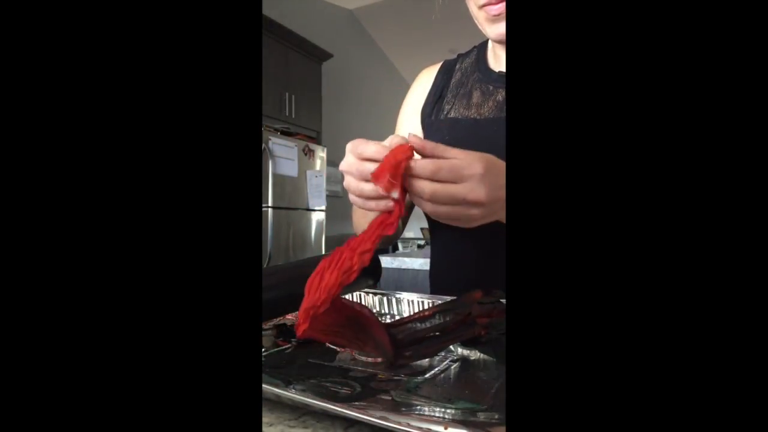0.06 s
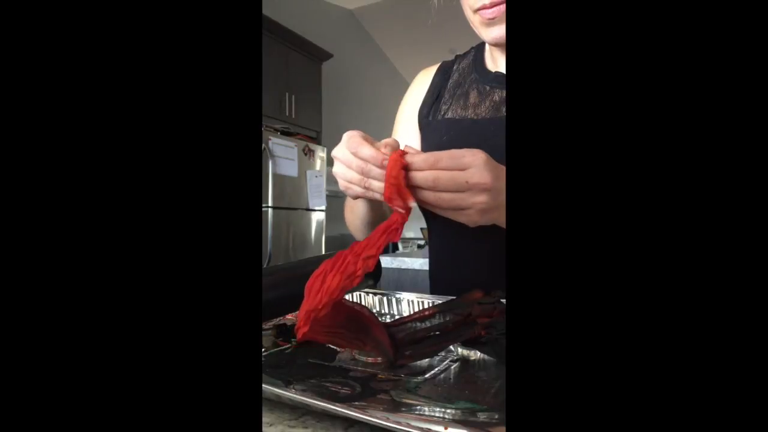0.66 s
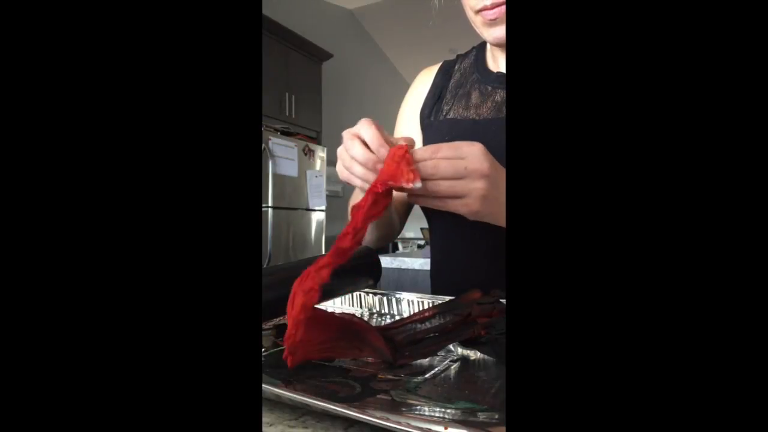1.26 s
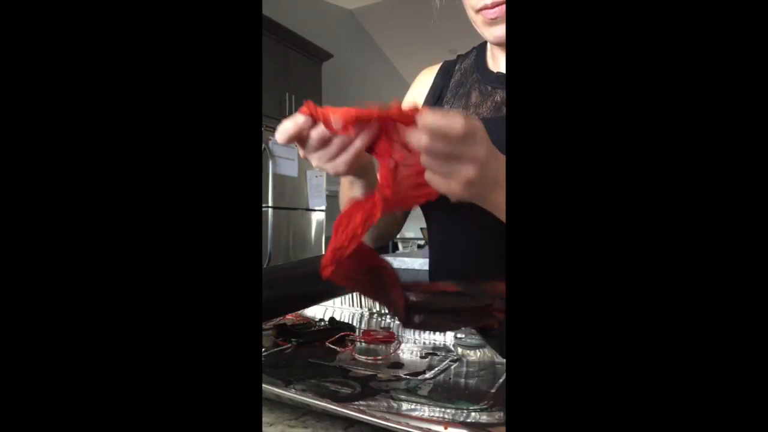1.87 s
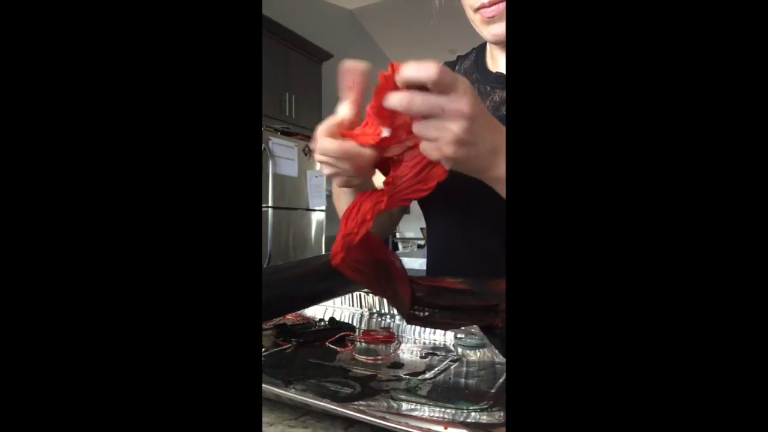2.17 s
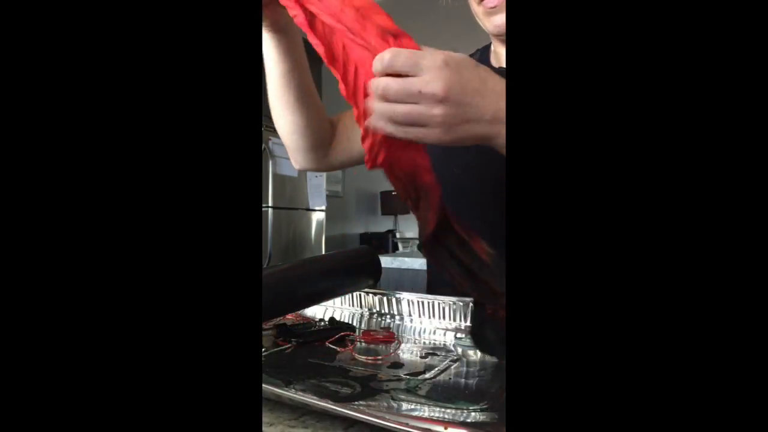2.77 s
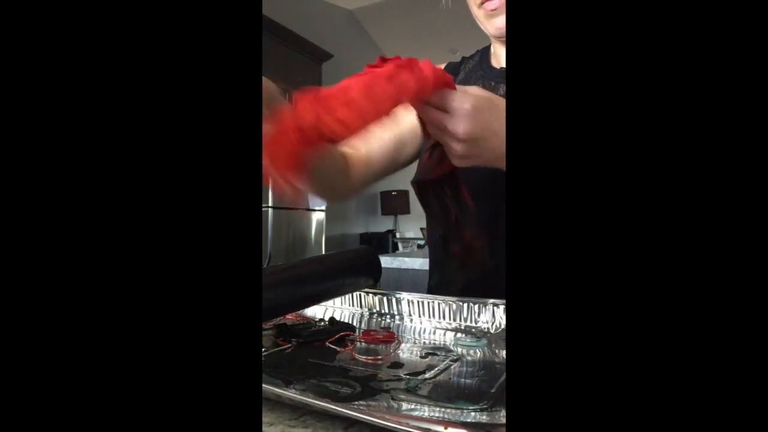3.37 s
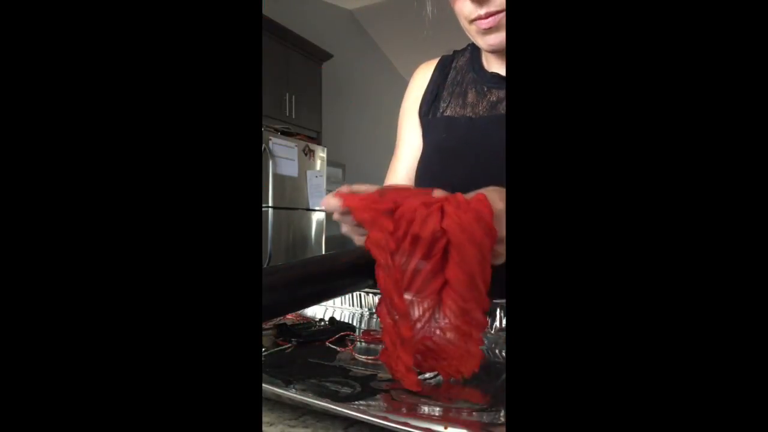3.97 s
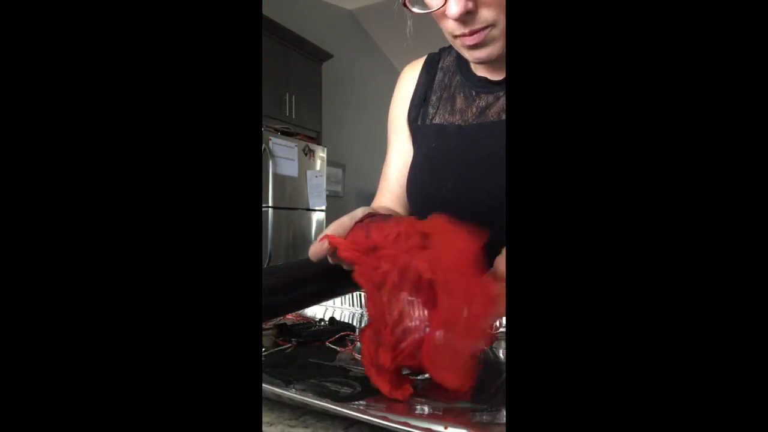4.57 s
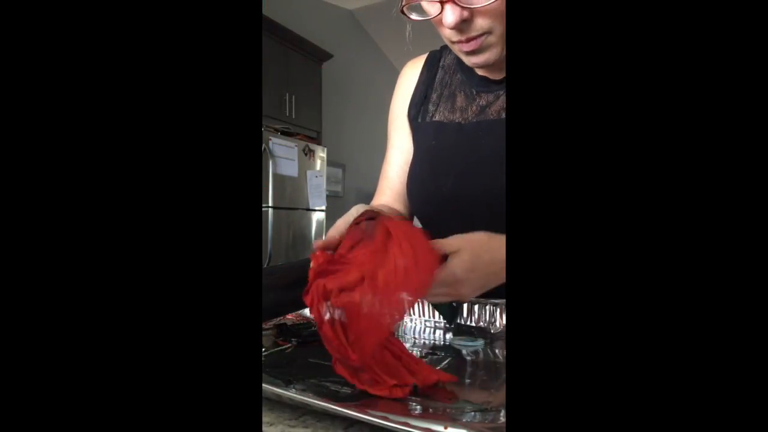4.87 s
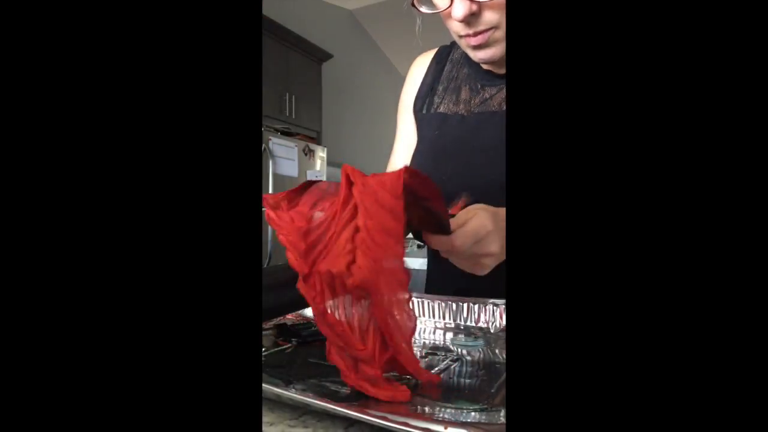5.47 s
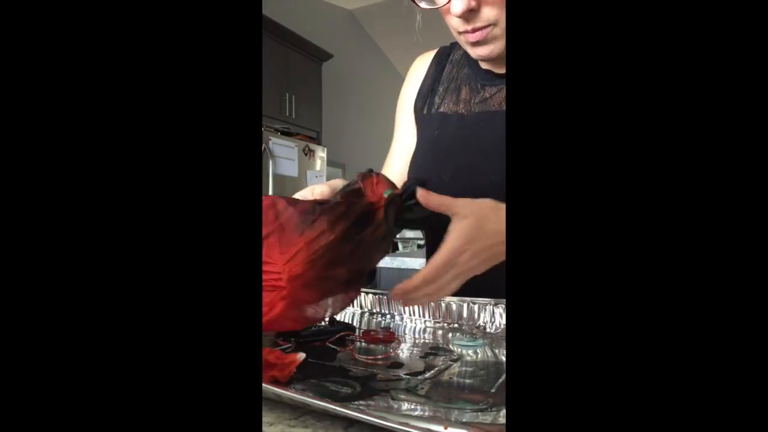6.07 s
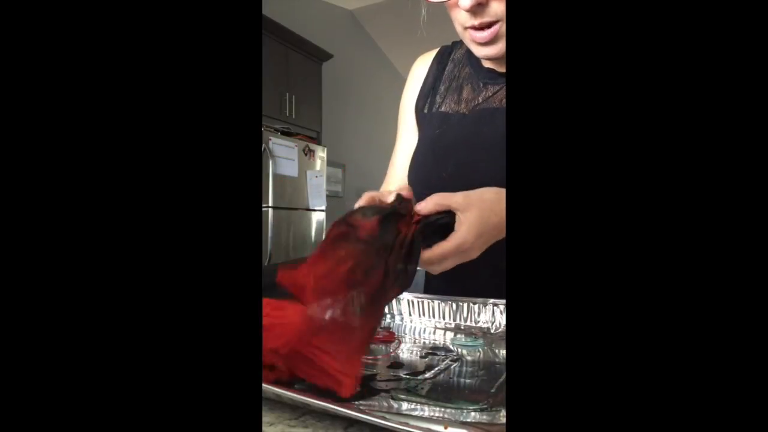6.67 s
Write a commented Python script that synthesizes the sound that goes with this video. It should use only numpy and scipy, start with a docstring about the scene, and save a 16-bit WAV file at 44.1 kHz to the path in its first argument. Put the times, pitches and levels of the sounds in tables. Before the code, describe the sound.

A faint, steady appliance hum fills a small kitchen throughout. Close to one microphone, a dry, stiff scarf gives way with a soft bump at about 0.1 seconds. From 1 second there are sparse, quiet rubs and crinkles, with another padded bump at 1.7. Between 2.2 and 3 seconds the taut cloth swishes through the fingers, growing louder. Just after 3 seconds stiff creases snap with a burst of crumpling. After a brief lull, the loudest crunch and a hollow bump come at 3.7. From there to about 6 seconds the scarf is shaken open in busy, uneven rustles: a fine hiss of threads, light flaps, folds brushing a foil tray and sharp dry ticks, with a further bump near 4.9. Two soft bumps and a tick fall around 6.2, then smaller crinkles continue until about 6.8. The counter and walls add a short tail.

```python
"""An appliance hums in a small kitchen; then, close to the one microphone, cloth gives way with a soft bump.
A dry, dye-stiffened scarf is being pulled off its pole and shaken open over a foil tray.
Threads rub with a fine hiss, folds crumple and brush the tray, and the loose cloth flaps.
From about two seconds the taut weave swishes through the fingers; from three, stiff creases snap.
The counter and the walls add a short tail."""
import sys
import numpy as np
from scipy import signal
from scipy.fft import rfft, irfft
from scipy.io import wavfile
from scipy.ndimage import uniform_filter1d

SR = 44100
rng = np.random.default_rng(int(sys.argv[2]) if len(sys.argv) > 2 else 0)


def waveform_to_disk(signal):
    """Save audio, clipped to [-1, 1], as 16-bit WAV at the path in sys.argv[1]."""
    frames = np.transpose(np.atleast_2d(signal))
    scaled = np.clip(frames, -1, 1) * 32767
    samples = np.round(scaled).astype(np.int16)
    wavfile.write(sys.argv[1], SR, samples)


N = 296793
TIME = np.arange(N) / SR

# The appliance in the background. Each row: frequency in Hz, rms level in dB.
HUM_PARTIALS = [(60, -81), (120, -80.5), (200, -77.5), (360.5, -65.5), (420, -78), (840, -101)]
# Folds giving way or slapping the tray. Each row: start in seconds, level in dB, hiss against
# that level in dB, ring in Hz, seconds to fall 60 dB.
FOLD_EVENTS = [(0.127, -54, -28, 1150, .06), (0.138, -53.5, -21, 1400, 0.086),
               (1.141, -65, -12, 1460, 0.073), (1.531, -67, -12, 1510, 0.075),
               (1.727, -52, -7, 1710, 0.032), (1.878, -65.5, -11, 1420, 0.15),
               (2.07, -65.5, 3, 3000, 0.067), (2.202, -52, -18, 1430, 0.031),
               (2.711, -54, -13, 1680, 0.052), (2.802, -53.5, 1, 1550, 0.078),
               (3.021, -47.5, 0, 2230, 0.38), (3.098, -32.5, -12, 1340, 0.064),
               (3.116, -36, -30, 1210, 0.068), (3.396, -63.5, -6, 2600, 0.14),
               (3.718, -24.5, -3.5, 1340, 0.049), (3.727, -30, -12, 1050, 0.063),
               (3.758, -32.5, 2.5, 1240, 0.023), (3.905, -40.5, -0.5, 3230, 0.093),
               (4.017, -41, -0.5, 1370, 0.095), (4.183, -34, -10, 2300, 0.048),
               (4.197, -37, -6, 1420, 0.063), (4.268, -35, -25, 2370, .033), (4.286, -37, -27, 1230, 0.14),
               (4.318, -36, -25, 2480, .1), (4.455, -46, -3.5, 1630, 0.075),
               (4.586, -38.5, -24, 1460, 0.081), (4.741, -46, -4.5, 3280, 0.11),
               (4.805, -34.5, -17, 1470, 0.071), (4.818, -37, -6.5, 1480, 0.08),
               (4.859, -41.5, -17, 1430, 0.041), (4.906, -41, -7, 2560, 0.057),
               (5.008, -55.5, -8, 1690, 0.089), (5.094, -50, -5, 1480, 0.095),
               (5.797, -48.5, -10, 1470, 0.17), (5.839, -54, 12, 3000, 0.12),
               (5.92, -35.5, -2, 2750, 0.044), (6.027, -45, 6.5, 2730, 0.033),
               (6.053, -42.5, -23, 2700, 0.084), (6.244, -37.5, -34, 1430, 0.033),
               (6.324, -53.5, -25, 1260, 0.11), (6.418, -45, -5.5, 1440, 0.028),
               (6.47, -50.5, -4, 1370, 0.031), (6.546, -52, -11, 1410, 0.032),
               (6.631, -52.5, -11, 1310, 0.065), (6.713, -42.5, -13, 2580, 0.075)]
# Fixed resonances, strongest near 1.45 kHz, that colour the crumpling folds.
# Each row: frequency in Hz, width in Hz, relative level in dB.
BODY_MODES = [(1013, 51, 3.5), (1240, 86, 3.5), (1464, 37, 23.5), (1466, 33, 5), (1930, 280, -11.5),
              (2500, 18, -28), (2770, 44, -25), (3450, 570, -3)]
# Hands meeting bunched cloth. Each row: start in seconds, level in dB, pitch in Hz.
HAND_BUMPS = [(0.142, -42.5, 230), (1.722, -34, 510), (3.721, -25.5, 270), (3.994, -33.5, 263),
              (4.859, -26.5, 370), (5.866, -40.5, 283), (5.872, -45.5, 68), (5.876, -39.5, 170),
              (6.244, -36.5, 333), (6.265, -34.5, 284)]
# Hands stroking the cloth. Each row: start and length in seconds, levels of rubbing, crumpling
# and flapping in dB, pitch of the buckling folds in Hz.
HAND_STROKES = [(1.122, 0.023, -78, -77, -76, 1610), (1.455, 0.016, -76, -80, -86, 2800),
                (1.645, 0.19, -78.5, -77, -71, 2620), (1.976, 0.16, -77, -76, -75, 3100),
                (2.182, 0.077, -68.5, -73, -68.5, 2960), (2.455, 0.088, -66.5, -70.5, -67.5, 2560),
                (2.605, 0.24, -71, -73, -71, 2160), (2.867, 0.17, -58.5, -57.5, -66, 2370),
                (3.04, 0.037, -54, -43.5, -68, 2350), (3.114, 0.014, -51.5, -48, -50, 1220),
                (3.756, 0.034, -50.5, -51, -53.5, 1800), (3.826, 0.067, -61.5, -58, -58, 2150),
                (3.962, 0.088, -53.5, -51, -54.5, 3370), (4.064, 0.14, -58.5, -61.5, -56.5, 1850),
                (4.196, 0.0087, -49.5, -44.5, -48.5, 2220), (4.266, 0.069, -57.5, -41, -57.5, 2410),
                (4.464, 0.061, -59, -58, -87, 2500), (4.581, 0.078, -56, -51.5, -64.5, 1850),
                (4.824, 0.037, -63.5, -50, -51.5, 1540), (4.887, 0.043, -64, -58.5, -60.5, 2000),
                (5.11, 0.066, -62.5, -57.5, -79, 2760), (5.184, .11, -58, -57.5, -66, 3170),
                (5.28, 0.17, -59.5, -62, -58, 2430), (5.492, 0.042, -55, -57.5, -55.5, 2850),
                (5.586, 0.089, -62, -53.5, -66.5, 3130), (5.669, .07, -58, -65, -60.5, 2600),
                (5.777, 0.02, -52, -52, -53, 2940), (5.86, 0.0069, -47.5, -55, -45, 2300),
                (5.98, 0.041, -68, -55, -66, 2440), (6.057, 0.026, -56, -54.5, -58.5, 2420),
                (6.256, 0.022, -68, -58.5, -57, 1650), (6.336, .11, -69, -69, -68.5, 2400),
                (6.492, 0.12, -72.5, -78, -70.5, 2090), (6.725, .03, -58, -68, -79, 2960)]
# The scarf running through the fingers. Each row: start and length in seconds, level in dB,
# lift of the silky top in dB.
TAUT_PULLS = [(2.205, .03, -66, 27), (2.474, 0.094, -70, 6), (2.87, 0.0048, -49.5, 1),
              (2.931, 0.05, -42.5, 4)]
# Stiff creases snapping. Each row: start in seconds, strength in dB, ring in Hz.
CREASE_SNAPS = [(3.058, -23, 2280), (3.101, -17.5, 2240), (3.9049, -15.5, 3150), (4.136, -31, 2960),
                (4.1858, -21, 2280), (4.2872, -14, 2540), (5.3188, -21.5, 1830), (5.412, -23, 3040),
                (5.4465, -40, 2950), (5.5674, -29, 3400), (5.669, -19.5, 3160), (6.246, -34, 3100)]
# The tone of each source and of the walls. Each row: frequency in Hz, relative level in dB.
ROOM_TONE_SPECTRUM = [(28, -21.5), (42, 4), (200, 0), (300, -3.5), (395, 9), (470, -7), (630, -12),
                      (800, -15.5), (1500, -20.5), (3000, -21.5), (5000, -27.5), (9000, -28),
                      (15500, -29.5)]
CRUMPLE_SPECTRUM = [(80, -21), (300, -24), (620, -3.5), (850, -15.5), (1400, 4), (1780, -10), (2500, 4.5),
                    (3750, -5.5), (4700, -10), (8000, -32.5), (16000, -65)]
THUMP_SPECTRUM = [(60, -67), (130, -14), (200, -12.5), (300, 1), (380, 11), (500, -1.5), (700, -10),
                  (1200, -15), (3000, -30)]
THREAD_SPECTRUM = [(600, -22.5), (1400, -1.5), (3000, 7), (4700, 0.5), (5400, 3.5), (6600, 1), (7400, -2.5),
                   (8600, 0.5), (10400, -6.5), (11400, -3.5), (13000, -5), (15800, -8)]
FLAP_SPECTRUM = [(35, -46), (60, -4), (120, -11), (155, -4.5), (205, -2), (290, -5.5), (380, 4.5),
                 (500, -3), (610, -2.5), (760, -8.5), (1200, -8), (3000, -39)]
TAUT_SPECTRUM = [(700, -11), (1150, -5.5), (1450, 6), (1850, -5), (2500, 1), (4500, -2), (5300, -2),
                 (7000, 1.5), (8500, -1.5), (10400, -12), (11300, -3.5), (12700, -16), (15800, -18)]
CREASE_SPECTRUM = [(100, -48), (400, 11), (1300, -6.5), (3200, 1), (5000, -6), (9000, -7), (16000, -22)]
WALL_SPECTRUM = [(200, 0), (2500, -4), (6000, -4), (16000, -18)]


def undb(db):
    """Decibels to gain."""
    return 10 ** (np.asarray(db) / 20)


def unit(response):
    """Scales a response so that white noise keeps its power."""
    return response / np.sqrt(np.sum(response ** 2))


def through(x, response):
    """Plays x through an impulse response."""
    return signal.fftconvolve(x, response)[:len(x)]


def colour(points, size=4096):
    """Minimum-phase response shaped by (Hz, dB) points, at unit power."""
    hz, db = np.transpose(points)
    gain_db = np.interp(np.log(np.arange(size // 2 + 1) * SR / size + 1), np.log(hz), db)
    cepstrum = irfft(np.log(undb(gain_db)))
    cepstrum[1:size // 2] *= 2
    cepstrum[size // 2 + 1:] = 0
    return unit(irfft(np.exp(rfft(cepstrum))))


def ring(hz, width_hz, size=4096):
    """Response of one resonance, equally high at its centre for any width."""
    t = TIME[:size]
    return width_hz * np.heaviside(t, .5) * np.exp(-np.pi * width_hz * t) * np.cos(2 * np.pi * hz * t)


def fade(t, t60):
    """Decay that falls 60 dB in t60 seconds."""
    return np.exp(-np.log(1000) * t / max(t60, .002))


def wander(rate_hz):
    """Smooth random drift with a spread near 1."""
    hold = int(SR / rate_hz)
    steps = np.clip(rng.standard_normal(4096)[:N // hold + 1], -2, 2)
    return 1.34 * uniform_filter1d(np.repeat(steps, hold), hold)[:N]


def slips(per_second, spread_db):
    """Tiny stick-slip clicks of uneven strength at random moments; rms 1."""
    strength = undb(spread_db * np.minimum(rng.exponential(size=N), np.pi))
    clicks = (rng.random(N) < per_second / SR) * strength * rng.choice([-1, 1], N)
    return clicks / clicks.std()


def kitchen(air_db=-67):
    """Room tone: steady air noise and the slightly wavering hum of an appliance."""
    air = through(rng.standard_normal(N), colour(ROOM_TONE_SPECTRUM)) * undb(air_db + 0.12 * wander(2.8))
    hum = np.zeros(N)
    for hz, db in HUM_PARTIALS:
        amplitude = np.sqrt(2) * undb(db + 0.26 * wander(2.6))
        hum += amplitude * np.sin(2 * np.pi * hz * TIME + 0.17 * wander(5.3))
    return air + hum


def fold_body(body_db=1):
    """Response of a fold: a broad crunch coloured by fixed resonances, strongest near 1.45 kHz."""
    modes = unit(sum(undb(db) * ring(hz, width) for hz, width, db in BODY_MODES))
    return unit(colour(CRUMPLE_SPECTRUM) + undb(body_db) * modes)


def folds(width_hz=300, ring_db=0.5, thump_db=-13, size=6000):
    """Each fold lets go in a dying run of slips that rings at its own pitch, with a thump and a hiss."""
    out, t = np.zeros(N + size), TIME[:size]
    body, thump_tone, thread_tone = fold_body(), colour(THUMP_SPECTRUM), colour(THREAD_SPECTRUM)
    for start_s, db, hiss_db, hz, t60 in FOLD_EVENTS:
        rise_s = 0.00091 * 2 ** ((-28.5 - db) / 19.5)  # weak folds give way more softly
        runs = rng.standard_normal((3, size)) * (1 - np.exp(-t / rise_s)) * fade(t, t60)
        crunch = through(runs[0], unit(body + undb(ring_db) * unit(ring(hz, width_hz))))
        thump = undb(thump_db) * through(runs[1], thump_tone)
        hiss = undb(hiss_db) * through(runs[2], thread_tone)
        start = int(start_s * SR)
        out[start:start + size] += undb(db) * (crunch + thump + hiss)
    return out[:N]


def bumps(cycles=8, rise_s=0.0033, size=6000):
    """Hands meet bunched cloth: the padded contact swings for a few cycles, soft and hollow."""
    out, t = np.zeros(N + size), TIME[:size]
    for start_s, db, hz in HAND_BUMPS:
        envelope = (1 - np.exp(-t / rise_s)) * fade(t, cycles / hz)
        start = int(start_s * SR)
        out[start:start + size] += undb(db) * envelope * np.sin(2 * np.pi * hz * t)
    return out[:N]


def swell(start, length, rise_s, fall_s):
    """One movement of the hand: it swells, holds and dies away, by 20 dB in rise_s and in fall_s."""
    before, after = np.maximum(start - TIME, 0), np.maximum(TIME - start - length, 0)
    return 10 ** -(before / rise_s + after / fall_s).clip(0, 10)


def stroke_gain(voice, fall_s, rest_db, settle_db, rise_s=0.049, settle_s=0.17):
    """Gain of one voice of the cloth: the strongest stroke leads, and each leaves the cloth settling."""
    gain = np.full(N, undb(rest_db))
    for start, length, *levels_db, _ in HAND_STROKES:
        push = swell(start, length, rise_s, fall_s)
        settling = undb(settle_db) * swell(start, length, rise_s, settle_s)
        gain = np.maximum(gain, undb(levels_db[voice]) * np.maximum(push, settling))
    return gain


def flexing(x, narrow_db, broad_db, size=512):
    """As the cloth changes shape, narrow and broad bands wax and wane within hundredths of a second."""
    cells = signal.stft(x, nperseg=size)[2]
    drift = uniform_filter1d(rng.standard_normal((2,) + cells.shape), size=5, axis=2)
    narrow = uniform_filter1d(drift[0], size=3, axis=0)
    broad = uniform_filter1d(drift[1], size=17, axis=0)
    gain = undb(narrow_db * narrow / narrow.std() + broad_db * broad / broad.std())
    return signal.istft(cells * gain / np.sqrt(np.mean(gain ** 2)), nperseg=size)[1][:N]


def crinkles(pitch_hz, octaves=0.13, width_hz=150, spread_db=4.5, count=2600, size=384):
    """Small facets of the stiff cloth pop over, each ringing briefly near its fold's pitch; rms 1."""
    when, strength, detune = rng.random((count, 3)).T
    start, t = (when * N).astype(int), TIME[:size]
    hz = pitch_hz[start] * 2 ** (octaves * np.log(detune / (1 - detune)) / 2).clip(-1, 1)
    gain = undb(spread_db * np.minimum(-np.log(strength), np.pi))
    pops = gain[:, None] * np.exp(-np.pi * width_hz * t) * np.cos(2 * np.pi * hz[:, None] * t)
    out = np.bincount((start[:, None] + np.arange(size)).ravel(), pops.ravel(), N)[:N]
    return out / out.std()


def rustle(crinkle_db=-3, wander_octaves=0.054):
    """Under the hands, threads slip densely, folds buckle more coarsely and loose cloth pushes air."""
    rubbing = stroke_gain(voice=0, fall_s=0.062, rest_db=-84, settle_db=-10)
    crumpling = stroke_gain(voice=1, fall_s=0.047, rest_db=-90.5, settle_db=-7)
    flapping = stroke_gain(voice=2, fall_s=0.092, rest_db=-77.5, settle_db=-6.5)
    start, length, *_, fold_hz = np.transpose(HAND_STROKES)
    pitch_hz = np.interp(TIME, start + length / 2, fold_hz) * 2 ** (wander_octaves * wander(18))
    grip = wander(130)  # the fingers catch unevenly
    buckles = slips(per_second=2600, spread_db=5.0)
    threads = unit(np.array([1, .6])) @ np.array([slips(per_second=8000, spread_db=-0.5), buckles])
    rubbed = through(threads * rubbing * undb(1.16 * grip), colour(THREAD_SPECTRUM))
    hiss = flexing(rubbed, narrow_db=3.0, broad_db=1.4)
    effort = crumpling * undb(2.3 * grip)
    crunch = flexing(through(buckles * effort, fold_body()), narrow_db=-1.0, broad_db=6.0)
    crumple = unit(np.array([1, undb(crinkle_db)])) @ np.array([crunch, effort * crinkles(pitch_hz)])
    flap = through(slips(per_second=3000, spread_db=1.5) * flapping, colour(FLAP_SPECTRUM))
    return hiss + crumple + flap


def pulls(silk_onset_hz=(7050, 13900)):
    """Drawn fast and taut, the weave slips so densely that it merges into a silky swish."""
    out = np.zeros(N)
    weave = slips(per_second=14000, spread_db=1.4)
    for start, length, db, silk_db in TAUT_PULLS:
        tone = [(hz, level + np.interp(hz, silk_onset_hz, [0, silk_db])) for hz, level in TAUT_SPECTRUM]
        envelope = undb(db) * swell(start, length, rise_s=0.044, fall_s=0.023)
        out += through(weave * envelope, colour(tone))
    return flexing(out, narrow_db=6.0, broad_db=2.0)


def snaps(shiver_db=-13, width_hz=700, ring_db=-3, size=1024):
    """A stiff crease flips over in one dry tick, and the cloth around it shivers briefly."""
    out, t = np.zeros(N + size), TIME[:size]
    crack = colour(CREASE_SPECTRUM)
    envelope = fade(t, t60=.007) + undb(shiver_db) * fade(t, t60=0.058)
    for start_s, db, hz in CREASE_SNAPS:
        tone = unit(crack + undb(ring_db) * unit(ring(hz, width_hz)))
        tick = unit(rng.standard_normal(size) * envelope)
        start = int(start_s * SR)
        out[start:start + size] += undb(db) * through(tick, tone)
    return out[:N]


def room(direct, counter_db=-9, counter_t60=0.0092, walls_db=-15, walls_t60=0.4, size=20000):
    """The microphone gets the direct sound, quick reflections off the counter, then the duller walls."""
    t = TIME[:size]
    counter = unit(rng.standard_normal(size) * fade(t, counter_t60) * (t > .002))
    tail = rng.standard_normal(size) * fade(t, walls_t60) * (t > .008)
    walls = unit(through(tail, colour(WALL_SPECTRUM)))
    return direct + undb(counter_db) * through(direct, counter) + undb(walls_db) * through(direct, walls)


def scene():
    """The scarf close up and the kitchen's hum behind it, in mono."""
    cloth = rustle() + pulls() + folds() + snaps() + bumps()
    return (room(cloth) + kitchen())[None]


def record(dry):
    """Behind the microphone, a low cut at 38 Hz and a steep top cut at 15.8 kHz."""
    thinned = signal.sosfilt(signal.butter(4, 38, "high", fs=SR, output="sos"), dry)
    return signal.sosfilt(signal.ellip(10, .2, 80, 15800, fs=SR, output="sos"), thinned)


dry = scene()
out = record(dry)
waveform_to_disk(out)
```